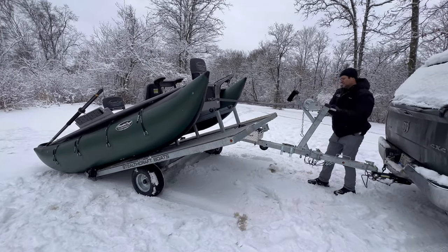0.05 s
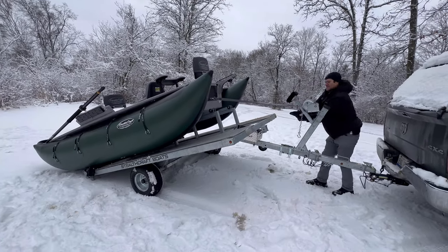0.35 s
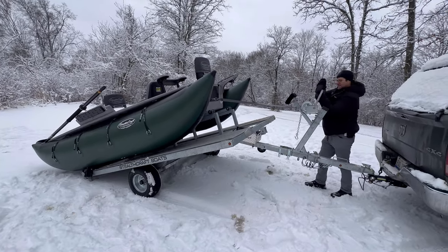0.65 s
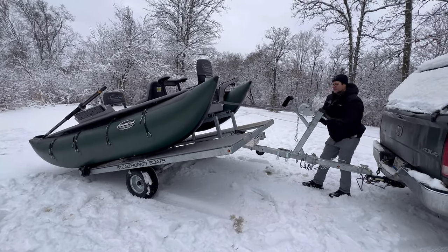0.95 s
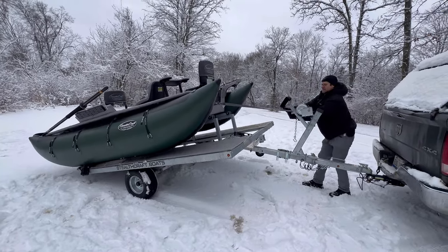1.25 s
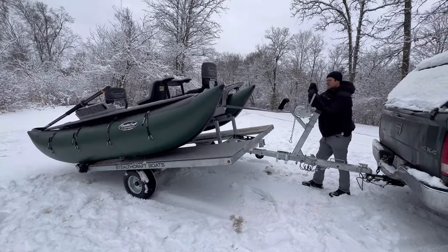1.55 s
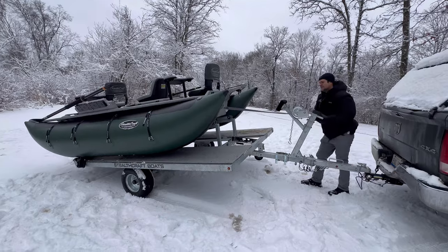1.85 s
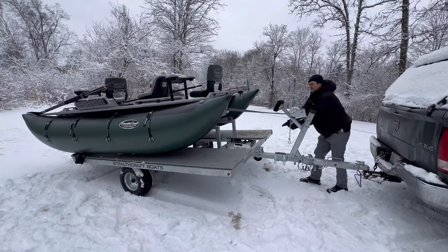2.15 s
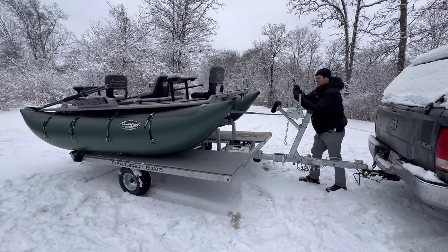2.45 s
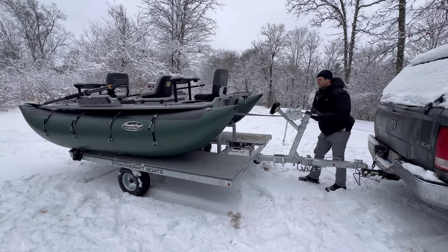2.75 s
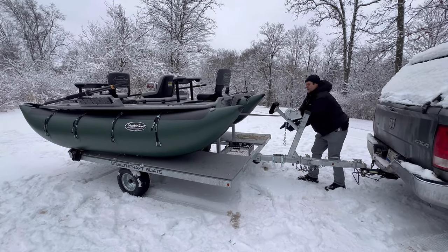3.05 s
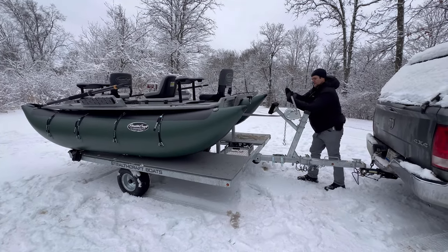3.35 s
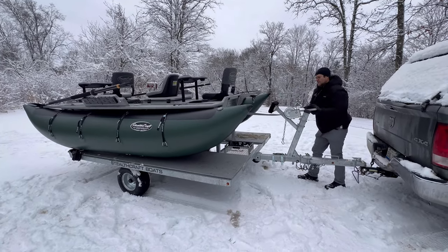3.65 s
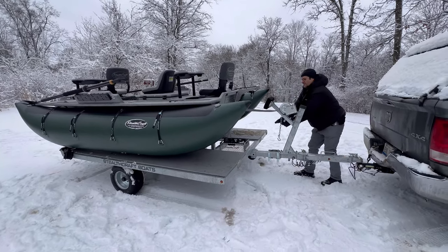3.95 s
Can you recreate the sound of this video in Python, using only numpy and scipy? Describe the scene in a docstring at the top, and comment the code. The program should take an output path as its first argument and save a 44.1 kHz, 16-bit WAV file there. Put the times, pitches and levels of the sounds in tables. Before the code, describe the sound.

A hand winch ratchet clicks throughout the four seconds, bright and steely, about 22 clicks a second, wavering slightly in pace. Beneath it an inflatable boat faintly rubs, bumps and scuffs along a metal trailer. The bed groans softly from about 1.6 to 2.4 seconds, then drops level with a clunk and small rebound near 2.7 seconds. The clicking carries on, outdoors with no echo.

```python
"""Steel ratchet clicks, about 22 a second: a hand winch hauls an inflatable boat up a metal trailer.
The pawl drops off each tooth and rings the gear and the winch housing.
Underneath, the hull rubs, bumps and scuffs along and sets the loaded bed groaning.
Near 2.65 s the tilting bed falls level with a clunk. Snowy clearing, so no echo."""
import sys
import numpy as np
from scipy import signal
from scipy.fft import rfft, irfft
from scipy.io import wavfile
from scipy.ndimage import uniform_filter1d

SR = 44100
rng = np.random.default_rng(int(sys.argv[2]) if len(sys.argv) > 2 else 0)


def store_pcm(level_fs):
    """Save levels as 16-bit WAV."""
    pcm = np.round(np.clip(level_fs, -1, 1) * 32767).astype(np.int16)
    wavfile.write(sys.argv[1], SR, np.atleast_2d(pcm).T)


N = 176400

# Sliding hull. Each row: time in seconds, relative rumble level in dB, relative rub level in dB.
SLIDING_LEVELS = [(0, -58, -60), (.55, -57, -59.5), (.9, -62, -61.5), (1.15, -68, -64), (1.5, -69, -61),
                  (1.85, -66, -59.5), (2.75, -56.5, -61.5), (4, -55.5, -58.5)]
# Hull rumble. Each row: frequency in Hz, relative density in dB.
RUMBLE_SPECTRUM = [(45, -19), (70, -12), (135, 4.5), (270, 1.5), (500, -3.5), (900, -7), (3000, -54)]
# Hull rub. Each row: frequency in Hz, relative density in dB.
RUB_SPECTRUM = [(40, -52), (200, -5), (550, 2.5), (1100, 1), (2000, -4), (8000, -15.5), (15000, -24.5)]
# Groans of the loaded bed. Each row: centre in seconds, level in dB, half length in seconds.
BED_GROANS = [(1.596, -57, .012), (1.768, -56, .04), (1.96, -50.5, 0.016), (2.09, -50, 0.058),
              (2.404, -44.5, 0.021)]
# Groan resonances. Each row: frequency in Hz, half width in Hz, relative level in dB.
GROAN_RESONANCES = [(262, 29, 1.5), (917, 92, -9), (1150, 33, -24)]
# Hull bumps. Each row: centre in seconds, level in dB, pitch in Hz, half length in seconds.
HULL_BUMPS = [(.27, -49, 146, 0.0076), (.63, -53.5, 192, 0.031), (1.015, -44.5, 184, 0.0074),
              (2.47, -52, 120, 0.016), (2.705, -45, 149, 0.027), (3.0, -43, 176, 0.0076)]
# Scuffs on the bunks. Each row: centre in seconds, level in dB, pitch in Hz, half length in seconds.
HULL_SCUFFS = [(.477, -46, 970, 0.0044), (.62, -40.5, 1790, 0.0032), (3.298, -38, 2670, 0.0019)]
# Trailer bed modes. Each row: frequency in Hz, relative level in dB, T60 in seconds.
BED_MODES = [(74, -22, 0.47), (140.7, -6.5, 0.28), (254, -1, 0.14), (340.5, 4, 0.14), (543, -7.5, 0.15),
             (696, -19, 0.24), (1398, -7, 0.08)]
# Bed landing and rebound. Each row: start in seconds, gain in dB, rise in seconds.
BED_BLOWS = [(2.652, -30.5, 0.014), (2.795, -39, 0.0074)]
# Clank of bed on frame. Each row: frequency in Hz, relative density in dB.
CLANK_SPECTRUM = [(60, -43), (170, -8), (350, -0.5), (900, -10), (1300, -0.5), (1600, -4), (1860, 5.5),
                  (2600, -7), (3100, -3), (5000, -23)]
# Clank decay. Each row: frequency in Hz, T60 in seconds.
CLANK_DECAY = [(300, 0.38), (900, 0.092), (3000, 0.035)]
# Pawl drops. Each row: start in seconds, force level in dB.
PAWL_DROPS = [(0.0285, -20), (0.0745, -20), (0.128, -20.5), (0.1823, -20.5), (0.2303, -18.5), (0.2735, -17),
              (0.314, -17), (0.3531, -17.5), (0.396, -18.5), (0.446, -18), (0.4964, -18), (0.5426, -17),
              (0.6017, -18.5), (0.655, -17.5), (0.6988, -16.5), (0.7412, -17.5), (0.7823, -17.5),
              (0.824, -20), (0.8636, -19), (0.9107, -18.5), (0.9559, -18.5), (0.9956, -18.5),
              (1.045, -17.5), (1.0978, -19.5), (1.1475, -18.5), (1.1972, -17.5), (1.2457, -17.5),
              (1.2829, -18), (1.3226, -18.5), (1.3659, -18), (1.4085, -17.5), (1.4516, -20), (1.504, -19.5),
              (1.5579, -20), (1.6047, -19.5), (1.6482, -18), (1.6859, -18), (1.719, -17), (1.752, -18.5),
              (1.7925, -19.5), (1.839, -18.5), (1.8858, -18.5), (1.9427, -19.5), (1.9957, -20),
              (2.0416, -21.5), (2.0816, -18), (2.1193, -17), (2.151, -17.5), (2.185, -20.5),
              (2.2276, -20.5), (2.273, -19), (2.3207, -20.5), (2.3753, -21), (2.4295, -22.5), (2.4815, -20),
              (2.5254, -20), (2.5668, -19.5), (2.601, -19.5), (2.6389, -21), (2.6836, -21), (2.731, -19.5),
              (2.7718, -21), (2.8266, -21), (2.8806, -21.5), (2.9282, -19.5), (2.9719, -18.5),
              (3.0126, -18.5), (3.047, -20), (3.0813, -19), (3.1228, -19.5), (3.1689, -18), (3.2117, -18.5),
              (3.2582, -19.5), (3.31, -19), (3.3606, -17.5), (3.4083, -18), (3.4523, -17), (3.488, -18.5),
              (3.5227, -19), (3.5608, -20.5), (3.6034, -19), (3.6467, -18.5), (3.6955, -19.5),
              (3.7439, -21.5), (3.7994, -21.5), (3.8573, -20), (3.9032, -19), (3.9394, -20),
              (3.9737, -19.5)]
# Pawl and gear modes. Each row: frequency in Hz, relative level in dB, T60 in seconds, pan in dB.
# Pan is left minus right.
STEEL_MODES = [(1817, -47.5, .05, -4), (3280, -38.5, 0.04, -5.5), (3820, -28.5, 0.021, -8.5),
               (3978, -28.5, 0.051, -2.5), (4454, -37.5, 0.022, 5.5), (5770, -30.5, 0.042, 2.5),
               (6190, -45.5, 0.11, 6), (6320, -25, 0.015, -2), (6910, -29, 0.02, -9),
               (5415, -39.5, 0.091, -10), (6410, -33.5, 0.062, -9), (11050, -38, 0.014, 20),
               (15400, -38.5, 0.031, 12)]
# Dense ring of the winch housing. Each row: frequency in Hz, relative density in dB.
HOUSING_SPECTRUM = [(300, -52), (1300, -16), (2700, -8.5), (3250, 0.5), (4400, 0), (5000, -2), (6300, 3),
                    (7200, 0), (8500, -9), (10000, -10), (11300, -11), (12400, -18.5), (15100, -7.5),
                    (16200, -38)]
# Housing decay. Each row: frequency in Hz, T60 in seconds.
HOUSING_DECAY = [(1500, 0.11), (3600, 0.066), (6200, 0.038), (9000, 0.046), (15000, 0.045)]
# Housing stereo balance. Each row: frequency in Hz, pan in dB.
HOUSING_BALANCE = [(1500, -4), (3300, -4), (4400, -0.5), (6200, -15), (8500, 0.5), (11000, 1.5),
                   (15000, -2)]
# Lower ring of the winch. Each row: time in seconds, gain in dB.
LOW_RING_GAINS = [(0, 1.5), (.8, -1), (1.0, 1), (1.6, 0.5), (2.1, 3), (4, 1.5)]
# Long note of the gear. Each row: time in seconds, relative level in dB.
GEAR_NOTE_LEVELS = [(.7, -45.5), (1.0, -39.5), (1.5, -37.5), (2.0, -48.5)]
# Note of the pawl. Each row: time in seconds, frequency in Hz, relative level in dB.
PAWL_NOTES = [(1.0, 5567, -28), (1.2, 5610, -18.5), (1.43, 4800, -22), (1.52, 5620, -18.5),
              (1.651, 5650, -15), (1.71, 4930, -21.5), (1.85, 5760, -28)]

HULL_LIKENESS, TOOTH_LIKENESS = 0.8, 0.84  # correlation: left to right, tooth to tooth
PAN_SPLIT = np.array([[0.5], [-0.5]])


def amp(db):
    return 10 ** (np.asarray(db) / 20)


def unit_rms(x):
    return x / np.sqrt(np.mean(x ** 2) + 1e-20)


def at_hz(points, hz):
    """Interpolate on a log-frequency axis."""
    point_hz, value = np.transpose(points)
    return np.interp(np.log(hz + 1), np.log(point_hz + 1), value)


def at_time(rows, time_s):
    """Interpolate each column after the time column."""
    row_s, *columns = np.transpose(rows)
    return [np.interp(time_s, row_s, column) for column in columns]


def delay(hz, delay_s):
    return np.exp(-2j * np.pi * hz * delay_s)


def add(mix, start_s, sound):
    part = mix[:, max(round(start_s * SR), 0):][:, :sound.shape[1]]
    part += sound[:, :part.shape[1]]


def blend(shared, fresh, likeness):
    """Noise correlated with shared by likeness."""
    return likeness * shared + np.sqrt(1 - likeness ** 2) * fresh


def stereo_pair(noise, likeness):
    return np.array([blend(noise[1], noise[0], likeness), noise[1]])


def coloured_noise(gain_db, likeness, size):
    """Stereo noise, rms 1, spectrum gain_db(hz)."""
    white = stereo_pair(rng.standard_normal((2, size)), likeness)
    return unit_rms(irfft(rfft(white) * amp(gain_db(np.fft.rfftfreq(size, 1 / SR))), size))


def hull_sliding(rumble_gain_db=3, rub_gain_db=4.5, patch_db=3, frame=512):
    """The hull rumbles and rubs unevenly over the bed."""
    rumble_db, rub_db = at_time(SLIDING_LEVELS, np.arange(N) / SR)
    rumble = coloured_noise(lambda hz: at_hz(RUMBLE_SPECTRUM, hz), likeness=0.38, size=N)
    rub = coloured_noise(lambda hz: at_hz(RUB_SPECTRUM, hz), HULL_LIKENESS, N)
    spectra = signal.stft(rub, nperseg=frame)[2]
    patches = uniform_filter1d(rng.standard_normal(spectra.shape[1:]), size=9, axis=0)
    patches = unit_rms(uniform_filter1d(patches, size=4, axis=1))
    rub = unit_rms(signal.istft(spectra * amp(patch_db * patches), nperseg=frame)[1][:, :N])
    return rumble * amp(rumble_gain_db + rumble_db) + rub * amp(rub_gain_db + rub_db)


def add_swell(mix, centre_s, level_db, half_s, noise):
    """Mix in noise under a Gaussian envelope; level_db applies at the crest."""
    size = noise.shape[1]
    t = (np.arange(size) - size / 2) / SR
    swell = np.exp(-0.5 * (t / half_s) ** 2)
    add(mix, centre_s + t[0], amp(level_db) * unit_rms(swell * noise) * np.sqrt(np.mean(swell ** 2)))


def bed_groans(slip_hz=44.9, size=16384):
    """The hull sticks and slips under load, driving the bed's resonances."""
    def body_db(hz):
        peaks = (amp(db) / (1 + ((hz - peak_hz) / width_hz) ** 2)
                 for peak_hz, width_hz, db in GROAN_RESONANCES)
        return 20 * np.log10(sum(peaks))

    out, t = np.zeros((2, N)), (np.arange(size) - size / 2) / SR
    for centre_s, level_db, half_s in BED_GROANS:
        slips = np.exp(-2 * ((slip_hz * t + rng.random()) % 1))
        add_swell(out, centre_s, level_db, half_s, slips * coloured_noise(body_db, HULL_LIKENESS, size))
    return out


def hull_contacts(rows, width_hz, likeness, size=16384):
    """Soft contacts: brief swells of noise around one resonance."""
    out = np.zeros((2, N))
    for centre_s, level_db, pitch_hz, half_s in rows:
        def band_db(hz):
            return -20 * np.log10(1 + (pitch_hz * np.log((hz + 1) / pitch_hz) / width_hz) ** 4)
        add_swell(out, centre_s, level_db, half_s, coloured_noise(band_db, likeness, size))
    return out


def bed_landing(clank_s=2.647, clank_db=-25.5, clank_rise_s=0.0037, frame=256):
    """The bed hits the frame with a short clank, booms and rebounds once."""
    out, t = np.zeros((2, N)), np.arange(SR // 2) / SR
    for start_s, gain_db, rise_s in BED_BLOWS:
        boom = sum(amp(db - 60 * t / t60_s) * np.sin(2 * np.pi * (hz * t + rng.random()))
                   for hz, db, t60_s in BED_MODES)
        add(out, start_s, amp(gain_db) * np.minimum(t / rise_s, 1) * boom[None])
    noise = coloured_noise(lambda hz: at_hz(CLANK_SPECTRUM, hz), likeness=0.75, size=len(t))
    bin_hz, age_s, spectra = signal.stft(noise, SR, nperseg=frame)
    decay = amp(-60 * np.maximum(age_s - clank_rise_s, 0) / at_hz(CLANK_DECAY, bin_hz)[:, None])
    clank = signal.istft(spectra * decay, nperseg=frame)[1][:, :len(t)]
    add(out, clank_s, clank * np.minimum(t / clank_rise_s, 1) * amp(clank_db))
    return out


def housing_ring(grain, t, hz, gain_db=-27.5):
    """Dense housing modes: noise decaying band by band from first contact at t = 0."""
    age_s = np.maximum(t, 0)
    band_hz, t60_s = np.transpose(HOUSING_DECAY)
    bands = np.array([at_hz(np.c_[band_hz, row], hz) for row in np.eye(len(band_hz))])[:, None]
    snap_db = 3.5 * np.exp(-age_s / 0.0082)
    crack_db = 2.5 * (t >= 0) * np.exp(-age_s / 0.00092)  # first contact is hardest
    # Faint hiss swelling just before each click.
    lead_in = np.where(t < 0, amp(-11) * np.exp(np.minimum(t, 0) / 0.002), 1)
    envelope = lead_in * amp(snap_db + crack_db - 60 * age_s / t60_s[:, None, None])
    colour = amp(gain_db) * unit_rms(amp(at_hz(HOUSING_SPECTRUM, hz)))
    pan = amp(PAN_SPLIT * at_hz(HOUSING_BALANCE, hz))
    noise = rfft(stereo_pair(grain, likeness=0.17))
    return (irfft(bands * colour * pan * noise) * envelope).sum(0)


def steel_ring(age_s, hz, rise_s=0.000094, spread_db=1.2, detune=0.006,
               graze_db=-8.5, seat_s=0.0003947, seat_spread_s=0.00008):
    """Pawl and gear modes, plus the contact spectrum: the pawl grazes the tooth, then seats."""
    mode_hz, mode_db, t60_s, pan_db = np.transpose(STEEL_MODES)
    strength, shift, timing = rng.standard_normal((3, len(mode_hz)))
    # Damped modes depend most on the contact.
    pitch_hz = mode_hz * (1 + detune * shift * (t60_s.min() / t60_s) ** 2)
    envelopes = amp(mode_db[:, None] - 60 * age_s / t60_s[:, None]) * (1 - np.exp(-age_s / rise_s))
    modes = envelopes * np.cos(2 * np.pi * pitch_hz[:, None] * age_s)
    contact = amp(graze_db) + delay(hz, seat_s + seat_spread_s * timing[0])
    return amp(PAN_SPLIT * pan_db + spread_db * strength) @ modes, contact


def gear_note(start_s, age_s, pitch_hz=3898, t60_s=0.15):
    """The struck gear's long note."""
    level_db, = at_time(GEAR_NOTE_LEVELS, start_s)
    return amp(level_db - 60 * age_s / t60_s) * np.sin(2 * np.pi * pitch_hz * age_s)


def pawl_note(start_s, age_s, t60_s=0.015):
    """The pawl's own note shifts as it rides across the teeth."""
    pitch_hz, level_db = at_time(PAWL_NOTES, start_s)
    pan_db = PAN_SPLIT * at_hz(HOUSING_BALANCE, pitch_hz)
    return amp(level_db + pan_db - 60 * age_s / t60_s) * np.sin(2 * np.pi * pitch_hz * age_s)


def drop_gain(start_s, force_db, hz, low_hz=4150, main_hz=5670, bright_hz=13000, spread_db=2):
    """The lower ring follows the drop's force only in part; some teeth snap brighter."""
    low_db = at_time(LOW_RING_GAINS, start_s)[0] + 0.56 * force_db
    bright_db = force_db + spread_db * rng.standard_normal()
    return amp(at_hz([(low_hz, low_db), (main_hz, force_db), (bright_hz, bright_db)], hz))


def ratchet(reference_db=-16, fall_s=0.0006, left_lag_s=0.00015, radiate_hz=1666,
            rebound_db=-8.5, rebound_s=0.0013, rebound_spread_s=0.00015, size=6144, lead_samples=256):
    """The pawl drops off each tooth, rings steel and housing, and rebounds once."""
    out, t = np.zeros((2, N)), (np.arange(size) - lead_samples) / SR
    age_s, hz = np.maximum(t, 0), np.fft.rfftfreq(size, 1 / SR)
    lag = delay(hz, np.array([[left_lag_s], [0]]))
    grain = rng.standard_normal((2, size))
    for start_s, force_db in PAWL_DROPS:
        grain = blend(grain, rng.standard_normal((2, size)), TOOTH_LIKENESS)
        steel, contact = steel_ring(age_s, hz)
        strike = rfft(housing_ring(grain, t, hz)) + rfft(steel + pawl_note(start_s, age_s)) * contact
        gain = drop_gain(start_s, force_db - reference_db, hz)
        rebound = amp(rebound_db) * delay(hz, rebound_s + rebound_spread_s * rng.standard_normal())
        click = strike * (1 + rebound) * lag + rfft(gear_note(start_s, age_s))
        add(out, start_s + fall_s + t[0], irfft(click * gain))
    low_cut = signal.butter(3, radiate_hz, "high", fs=SR, output="sos")  # small parts radiate no bass
    return signal.sosfilt(low_cut, out)


def scene():
    bumps = hull_contacts(HULL_BUMPS, width_hz=61, likeness=0.76)
    scuffs = hull_contacts(HULL_SCUFFS, width_hz=460, likeness=HULL_LIKENESS)
    return bumps + scuffs + bed_groans() + hull_sliding() + ratchet() + bed_landing()


def record(dry):
    """Microphone low cut and band limit."""
    low_cut_hz, edge_hz = 55, 16500
    dry = signal.sosfilt(signal.butter(2, low_cut_hz, "high", fs=SR, output="sos"), dry)
    band_limit = signal.firwin(255, edge_hz, window=("kaiser", 8), fs=SR)
    return signal.oaconvolve(dry, band_limit[None], "same")


dry = scene()
out = record(dry)
store_pcm(out)
```